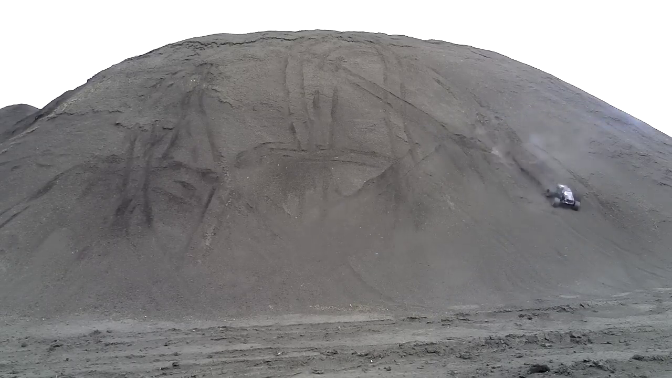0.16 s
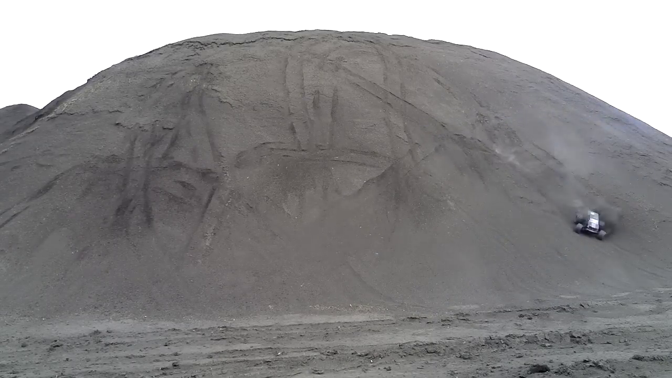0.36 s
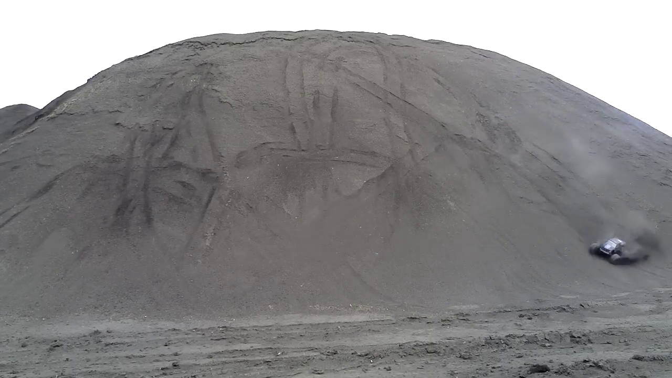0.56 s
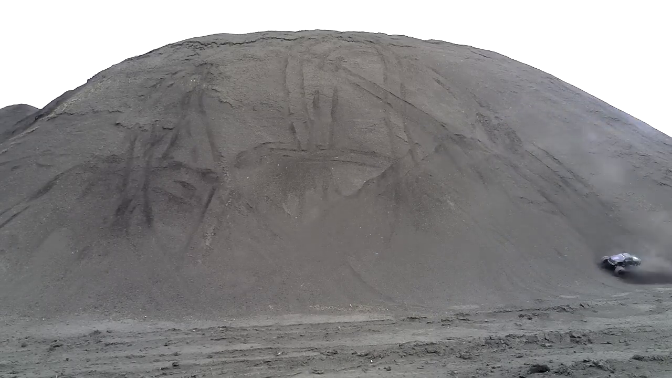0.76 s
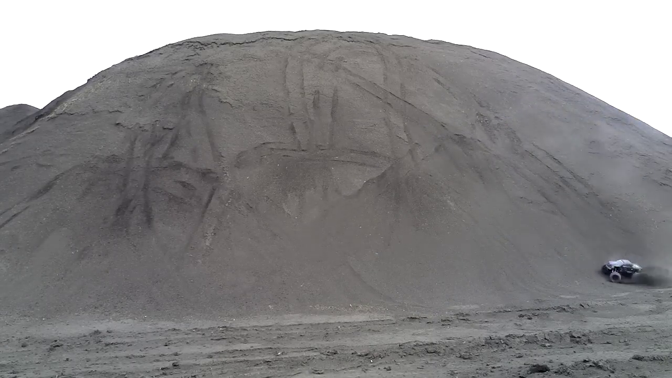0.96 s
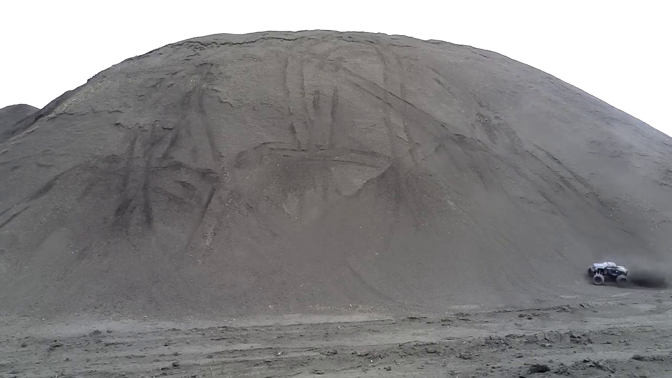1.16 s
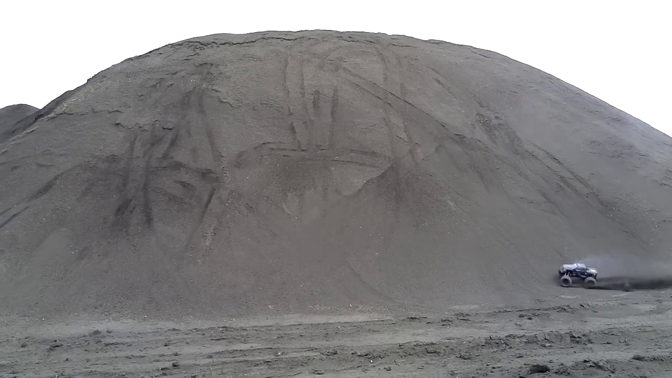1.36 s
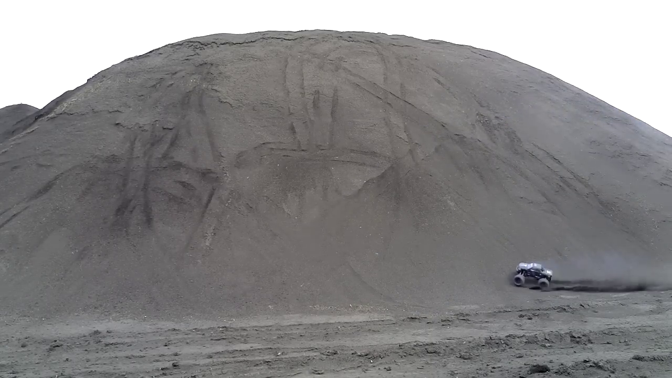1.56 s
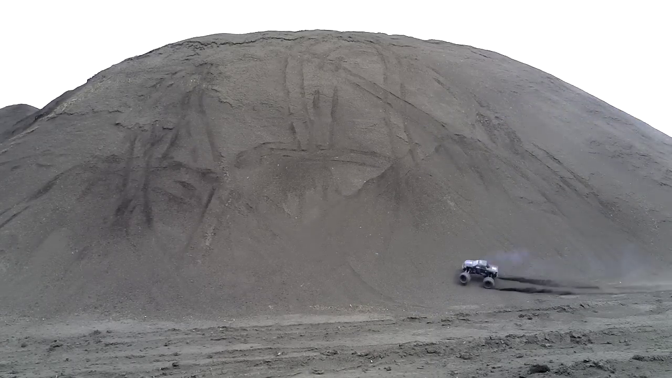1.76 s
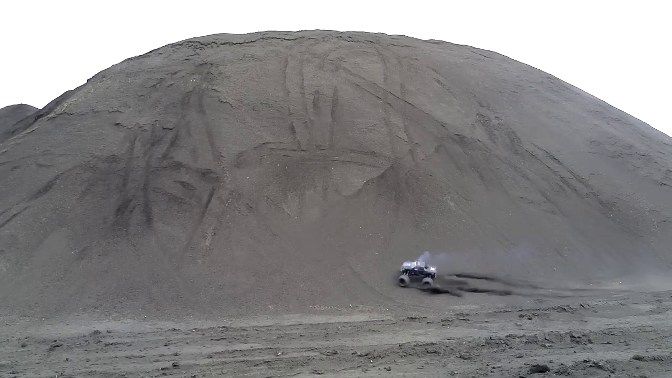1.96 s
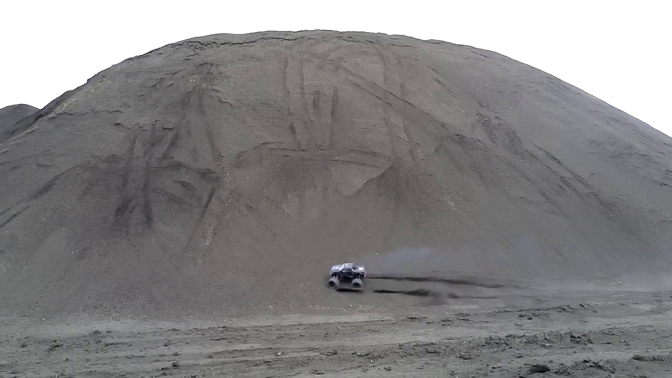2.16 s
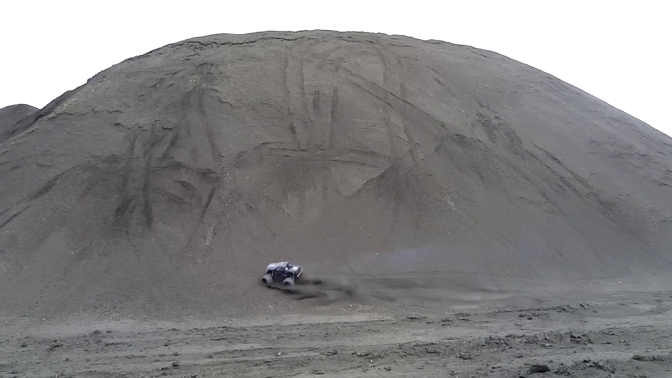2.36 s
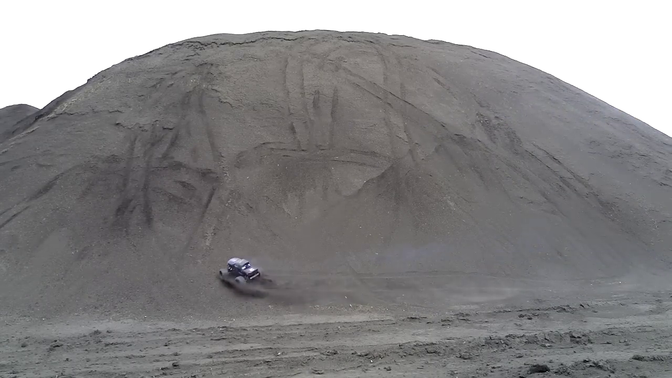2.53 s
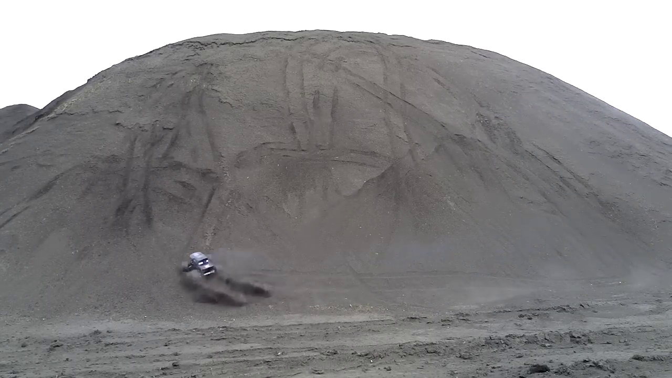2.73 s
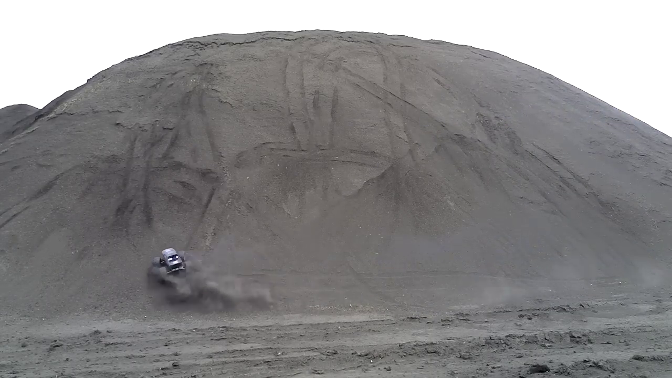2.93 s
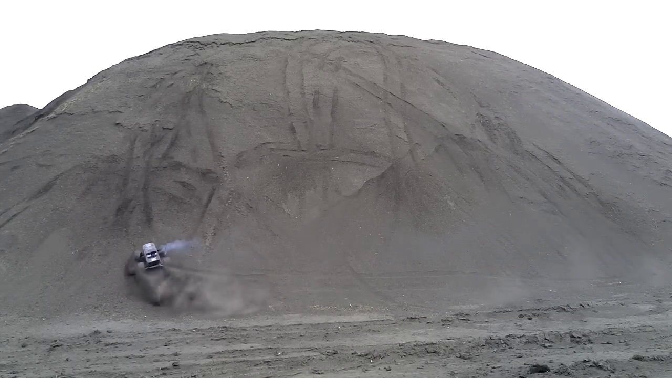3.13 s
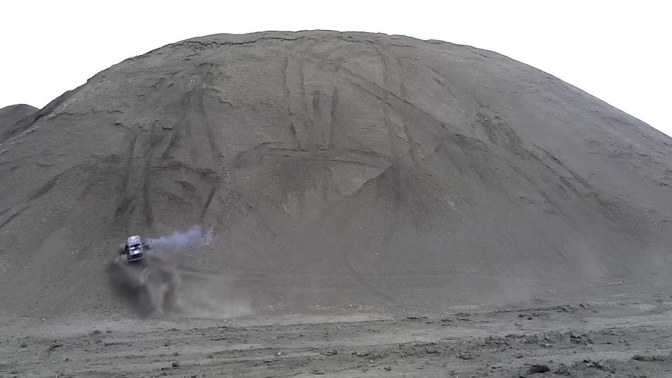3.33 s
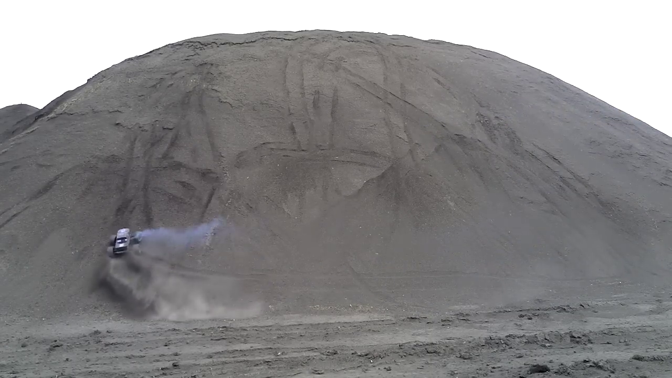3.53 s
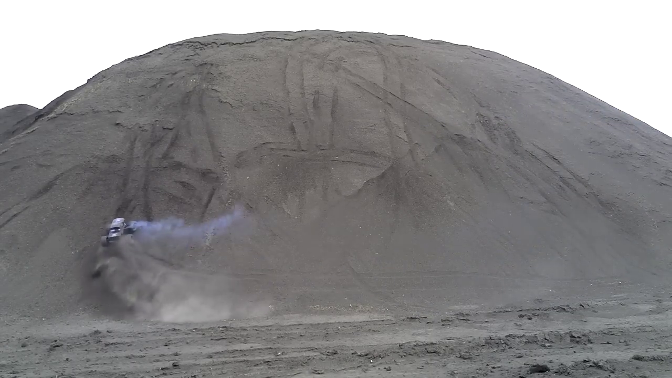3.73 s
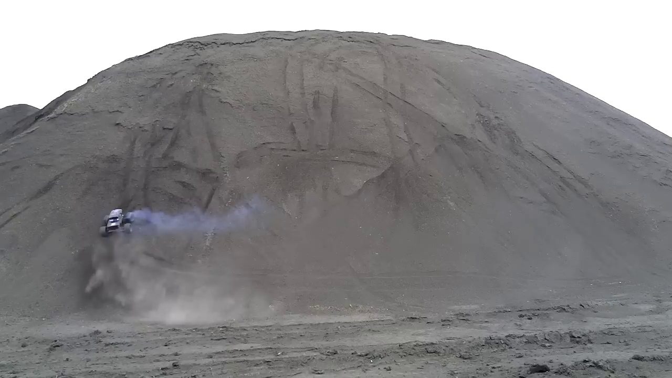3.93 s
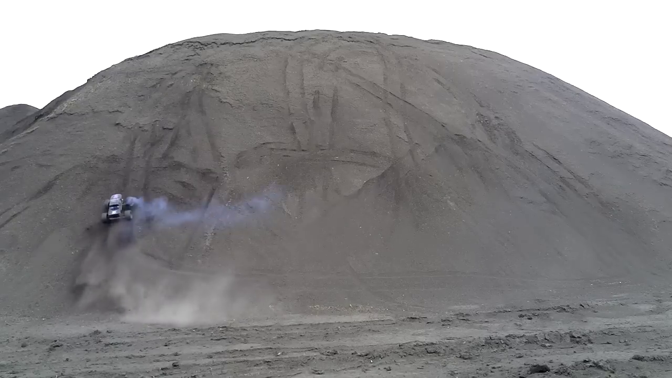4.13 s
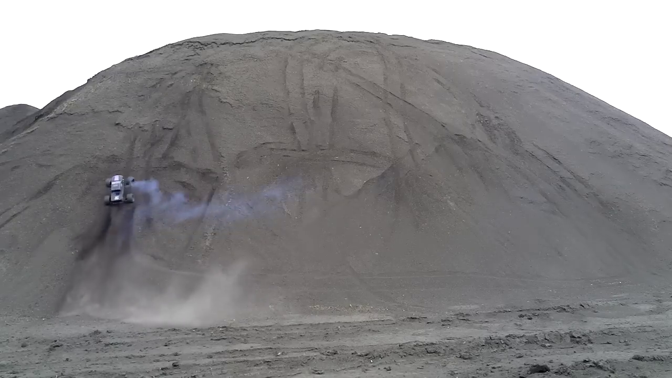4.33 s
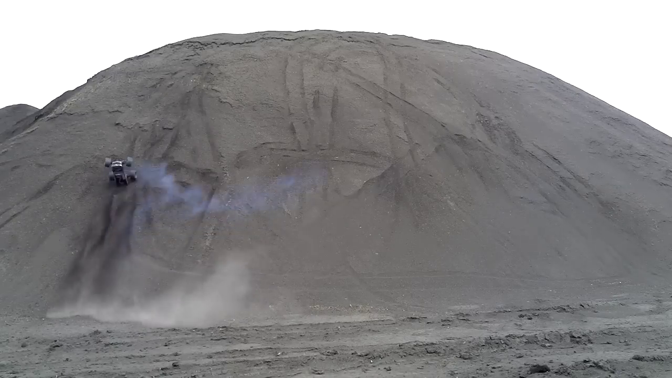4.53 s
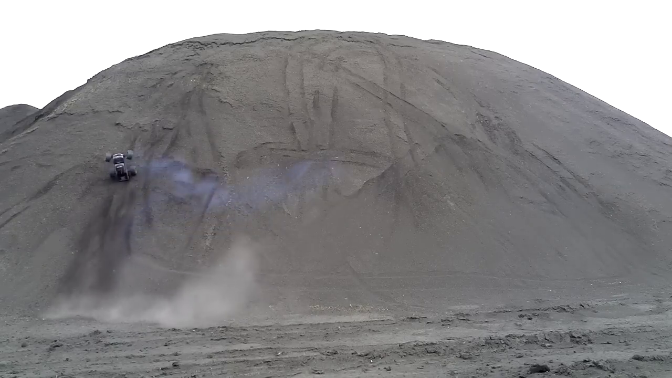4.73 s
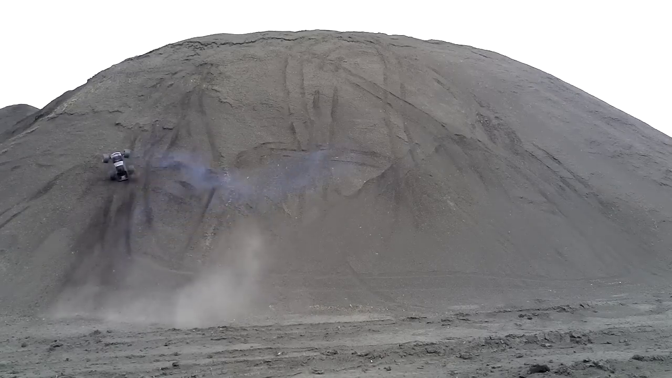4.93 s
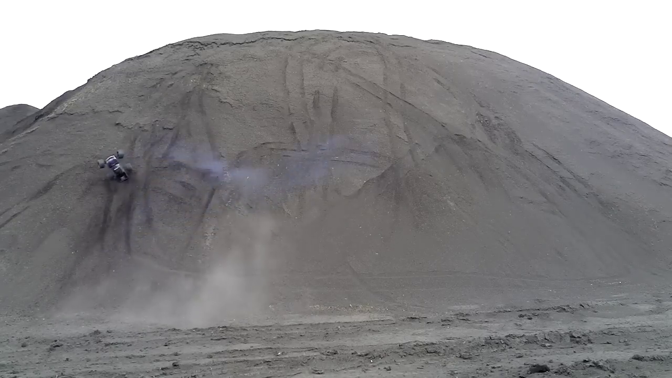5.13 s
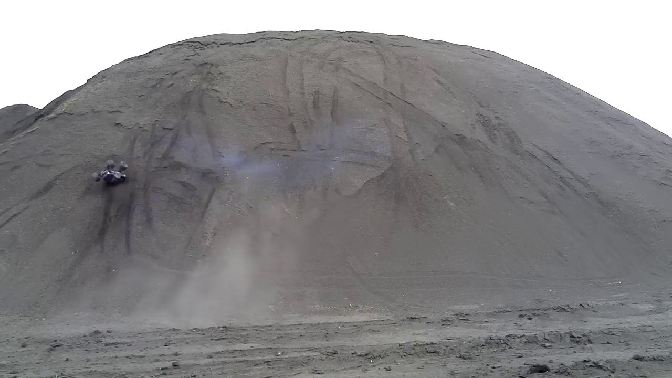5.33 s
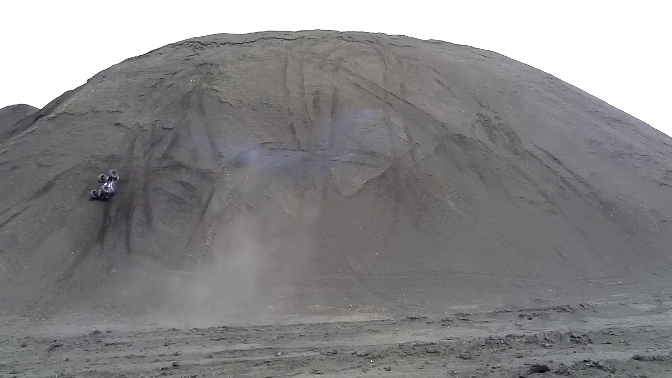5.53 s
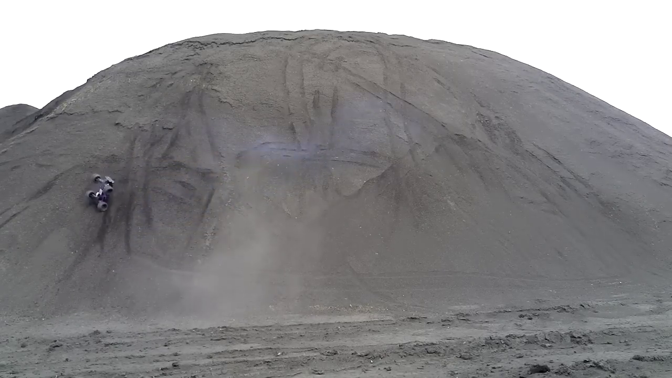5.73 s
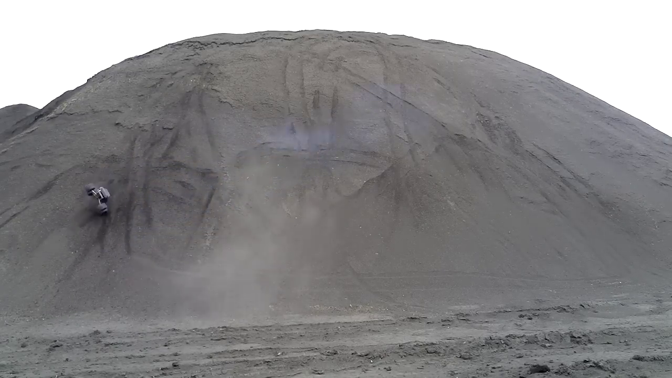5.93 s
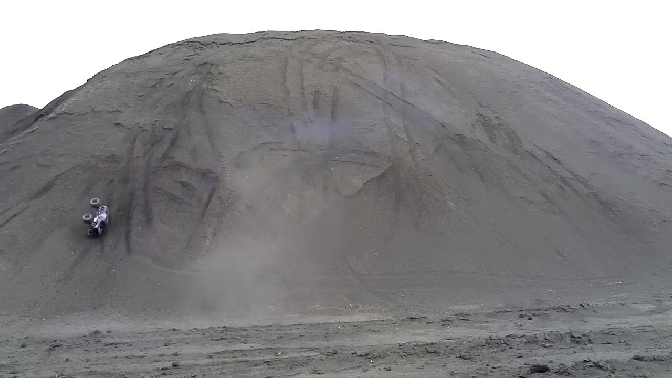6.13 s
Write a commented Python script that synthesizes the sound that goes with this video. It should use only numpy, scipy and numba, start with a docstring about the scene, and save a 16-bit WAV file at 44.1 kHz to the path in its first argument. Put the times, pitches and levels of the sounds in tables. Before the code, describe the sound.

Outdoors, a tiny high-revving engine blips and snarls, holds a strained rasping whine, then winds down to a steady popping idle as the chassis clatters.

```python
"""Two-stroke model truck on a sand hill

A small two-stroke model truck blips its throttle at the foot of a sand hill, climbs it and drops to idle.
Each firing is a pop of nearly in-step overtones, with rasp from shell resonances, eddies and gas noise.
The colour shifts as the pipe turns to or from a microphone with two unlike ports; knocks are decaying
rings, thin whistles are narrow noise, the slope returns a late copy and shaped noise is the open air."""
import sys
import numpy as np
from scipy import signal
from scipy.fft import rfft, irfft, next_fast_len
from scipy.io import wavfile
from scipy.ndimage import uniform_filter1d, map_coordinates
from numba import njit

SR = 44100
rng = np.random.default_rng(int(sys.argv[2]) if len(sys.argv) > 2 else 0)


def digitize_waveform(pressure):
    """Quantize a signal to 16-bit integers and store it at the path in sys.argv[1].

    Rows of a 2-D input are taken as channels; values are limited to [-1, 1].
    """
    field = np.atleast_2d(pressure).T
    bounded = np.clip(field, -1, 1)
    quanta = np.round(bounded * 32767).astype(np.int16)
    wavfile.write(sys.argv[1], SR, quanta)


N = 272979

# Engine speed. Each row: time in seconds, firing rate in Hz.
REVS = [(0, 299), (.08, 343.5), (.14, 289.4), (.26, 206.8), (.47, 198.2), (.79, 195.8), (.9, 281.3),
        (1., 269.3), (1.03, 284.5), (1.22, 307.6), (1.29, 338.6), (1.314, 327.2), (1.34, 357),
        (1.38, 332.7), (1.41, 366.8), (1.45, 347.4), (1.46, 394.3), (1.48, 391.7), (1.52, 321.3),
        (1.6, 312), (1.69, 324), (1.76, 366), (1.83, 340.5), (1.88, 281), (1.91, 332), (1.93, 334.4),
        (1.95, 301), (1.978, 357), (2.005, 325.7), (2.028, 361.9), (2.05, 346), (2.072, 376), (2.12, 374),
        (2.15, 401.4), (2.22, 341.2), (2.28, 258), (2.36, 211.2), (2.5, 190.2), (2.55, 200.4), (2.6, 274.6),
        (2.69, 295.1), (2.79, 247.2), (2.89, 269.7), (2.98, 264.3), (3.09, 310.5), (3.13, 303.5),
        (3.178, 339), (3.198, 322.3), (3.232, 351.5), (3.254, 344), (3.292, 377.4), (3.316, 378.7),
        (3.338, 361), (3.37, 392), (3.398, 372.3), (3.44, 405.2), (3.472, 392), (3.508, 427.9),
        (3.534, 413), (3.57, 431.8), (3.72, 379.2), (3.89, 443.4), (4.02, 417.8), (4.074, 426.5),
        (4.1, 398), (4.122, 399), (4.17, 368.3), (4.25, 443.6), (4.29, 386.5), (4.314, 413.4), (4.346, 394),
        (4.424, 420), (4.462, 399), (4.5, 409), (4.545, 351), (4.606, 351.8), (4.7, 282.5), (4.782, 257.3),
        (4.88, 236.6), (5.14, 218.4), (5.22, 200.9), (5.33, 193.1), (6.19, 192.2)]
# Waver of the revs. Each row: firing rate in Hz, share of that rate.
WAVER = [(200, .003), (240, .005), (290, .004), (345, .008), (430, .009)]
# Throttle blips. Each row: start of opening in seconds, start of shutting in seconds, rasp gained in dB.
BLIPS = [(0, 0.1, 3), (0.81, 0.945, 6), (0.969, 1.452, 3.5), (1.57, 1.774, 2), (1.892, 2.133, 4.5),
         (2.543, 2.705, 5), (2.797, 4.547, 4)]
THROTTLE_S = 0.051  # time to open or shut
# Pipe note against the rasp. Each row: pitch in Hz, then level in dB at the foot with throttle open,
# at the foot shut, on the hill open, on the hill shut.
PIPE_NOTE = [(203, -14, -5, -16, -2.5), (290, -7, 2, 4.5, -5.5), (380, -14, -6.5, -10, -18),
             (515, 4.5, 6.5, -5.5, -6.5), (615, 4, -11, -4.5, -3.5), (674, 4, -14, -13, 0),
             (797, -9, -26, -14, -1.5), (927, -12, -3, -6, 6.5), (1196, -10.5, -20.5, -9.5, -16.5),
             (1360, -15.5, -4, -6, -3), (1530, -16.5, -21.5, -12.5, -6), (1696, -25.5, -20, -5.5, -9.5),
             (2030, -17.5, -15, -7.5, -12), (2050, -25.5, -16.5, -12, -12), (2900, -26.5, -23, -14, -20.5),
             (3000, -22, -19, -14.5, -15), (3600, -22, -30, -21.5, -25), (5500, -20, -26, -29, -33)]
# Start and end in seconds of the turn uphill.
TURNS_UPHILL_S = (2.56, 2.926)
OVERTONES = 14  # tones in the pipe note, fundamental included
# With the throttle shut the overtones thin out until the revs are back at idle.
# Each row: firing rate in Hz, level change in dB.
COASTING = [(200, 0), (240, -3.5), (400, -6)]
WANDER_DB = 42  # slow swell of an overtone, per step above the fundamental (7 at most) and share of waver
# The two lowest tones change on their own as the truck moves over the ground.
# Each row: time in seconds, fundamental change in dB, octave change in dB.
LOWEST = [(0, -1, -6.5), (.2, 0.5, -9), (.85, 4, 5), (1.26, 1, 3.5), (1.31, -11, 0), (1.44, 0, 0.5),
          (1.49, -10.5, 10), (1.59, 0, -1), (1.68, -5, 3), (1.78, -5, -1), (1.86, -5.5, 8), (1.96, 4.5, 6),
          (2.01, -5, 2.5), (2.08, 3.5, -1), (2.15, 0, -5), (2.2, -5.5, 8), (2.25, -5.5, -11.5),
          (2.62, 7, 6), (3.1, 2.5, 8), (3.4, -0.5, 3.5), (3.9, -3.5, 0), (4.25, 1.5, 10),
          (4.52, -15.5, 10.5), (4.62, -14, -5), (4.69, 0.5, -0.5), (5.3, -6.5, -5.5), (5.65, -1, -3),
          (6.19, 5.5, 18)]
# Pipe resonances that lift or cut the overtones crossing them. Each row: centre in Hz, width as a
# share of the pitch.
PIPE_RINGS = [(1050, 0.22), (1370, 0.11), (1720, 0.13), (2550, 0.24)]
# How far each is aimed at the microphone. Each row: time in seconds, dB of each resonance, low to high.
PIPE_AIM = [(0, -4, -8, 7.5, 13.5), (.1, 10, -11, 13, 13), (.22, 5, 1, 7, 12), (.3, -3, 8, 11, 2),
            (.75, 1, 3.5, -7, 5), (.9, -0.5, -2, 1, 14), (1.05, 3.5, -2.5, 4, 9), (1.3, 4.5, -4, -1, -8),
            (1.47, -2, -2, 1, -21), (1.75, 1.5, -2, -1, 12), (2.13, -3, -7, 6, 16), (2.45, -19, 6, -4, 2),
            (2.55, -8, 5, 6, 9), (2.6, 2, -7, 3, 23.5), (2.7, -7, 0, 8, 17.5), (2.76, -7, 18, 16, 5),
            (2.95, -3, 4, -2, 6), (3.15, 5, 8, 1, 6.5), (3.55, -12, -1, 5.5, 0), (3.9, -4, -0.5, -1, -0.5),
            (4.15, -0.5, -5, 4.5, 5), (4.42, -10, 9, -3, 4.5), (4.55, 5, -11, -11, -7),
            (4.65, -7, -4, 7.5, 4), (4.75, 5, -7, 6.5, 8), (4.95, -1.5, 0, 7, 6), (5.25, 1, -1, 1, -13),
            (5.5, -6, -5, -6, -4), (5.75, 3, -1, -6, 4), (6.02, 8.5, 10, 4, 5), (6.19, 7, 2, -1, 7)]
# Exhaust rasp with the throttle shut, before the turning. Each row: firing rate in Hz, level in dB.
RASP = [(192, -38.5), (215, -37), (270, -30), (340, -23.5), (440, -22.5)]
# Change as the truck turns. Each row: time in seconds, facing resonance in Hz, level change in dB, note
# change in dB, roar change in dB, left minus right in dB before 4 dB is taken off.
TURN = [(0, 5050, 4.5, 5.5, -8, 4), (.08, 5200, -1.5, 0.5, 0, 4), (.14, 5030, -3, -2.5, 5, 4),
        (.26, 3280, 1, 3.5, 3.5, 3.5), (.7, 3040, -5.5, 4, 5, 4.5), (.95, 2582, -1, 2, -7, 4.5),
        (1.1, 5750, 5, -1.5, -3, 5), (1.3, 5500, 3, 2, 1, 5), (1.5, 5124, -2, 7.5, 7, 4.5),
        (1.65, 4364, 0.5, 6, 3, 4), (1.8, 3600, 1.5, 0.5, 5, 3.5), (1.89, 3300, 2, 1, 4, 4),
        (2., 3154, -2, 3, 4.5, 3.5), (2.2, 3000, 1, 3.5, 4, 3.5), (2.4, 3208, 4, -1.5, 3.5, 4),
        (2.6, 2593, 1, -1.5, 1, 4), (2.72, 2583, 2, -7.5, 1.5, 4), (2.79, 2594, 2.5, -0.5, 0, 4),
        (2.87, 2602, 2, -5.5, -2, 4), (3., 2580, 1.5, -5.5, 0.5, 3.5), (3.15, 5302, -0.5, -6, 3, 3.5),
        (3.45, 4350, 3, -0.5, 2, 3.5), (3.62, 6000, 1, 1.5, 2.5, 3.5), (3.85, 4610, 3, 2.5, 1, 3.5),
        (4.17, 6810, 1.5, -3, 2, 3), (4.3, 5510, -1.5, 0.5, 3.5, 3.5), (4.45, 4585, -1, -1.5, 3.5, 3.5),
        (4.55, 5060, -0.5, 1.5, 1, 3), (4.68, 5200, 1.5, -1.5, -3, 4), (4.9, 5102, 0, -4.5, -2, 3.5),
        (5.3, 6830, -2, -1.5, 1, 5), (5.5, 6910, -5.5, 5.5, 7, 5), (5.6, 3374, -3, 4.5, 7, 4),
        (5.88, 3400, -0.5, -2.5, 7.5, 4), (6.19, 3600, -2.5, -8.5, -8, 4.5)]
# Hiss and low roar follow the rasp. Each row: rasp in dB, hiss relative to it in dB before a lift of 4 dB,
# roar relative to it in dB before the turning.
MIX = [(-39, -9.5, -4.5), (-31, -8, -0.5), (-16, -7, -7)]
# At high revs the eddies slip against the crank and plain gas grows.
# Each row: firing rate in Hz, slip in turns, gas share.
SLIP = [(200, .004, 1.1), (300, .009, 1.1), (360, .013, 1.2), (430, .015, 1.2)]
# Body shell and pipe resonances. Each row: centre in Hz, width in Hz, level in dB before aim and flicker.
SHELL = [(2444, 91, -7), (4640, 85, 0.5), (5440, 590, 3), (5750, 130, -7), (6000, 92, 0.5),
         (6110, 110, 5.5), (6680, 120, 10.5)]
SHELL_DRIFT = .02  # share by which the resonances wander
# Bands of the rasp that open and close as the pipe swings. Each row: centre in Hz, width in Hz.
RASP_BANDS = [(2550, 520), (3550, 990), (6100, 1600), (9300, 3100)]
# Their swing. Each row: time in seconds, level of each band in dB, low to high.
RASP_BAND_DB = [(0, 0, -3, 1, 6.5), (.4, -2, 3, 2.5, -3), (.75, -2, 2.5, 2.5, -1), (.92, 0, 4, 2.5, 1),
                (1.2, 0, 0.5, 1, 6.5), (1.45, -2, 4, 3, 3), (1.75, 4, 3.5, -2, -7), (2.1, 4, 4.5, -5, 2.5),
                (2.3, 0, -6, 0, -2), (2.55, 5, -4, -3, -6), (2.65, -6, -14, 1.5, 1), (2.95, 3, -4, 3, -16),
                (3.15, -22, -4, 0.5, 0), (3.4, -11, 2.5, -0.5, 0.5), (3.75, 2, 1.5, 1.5, 3.5),
                (3.95, 4, -4, -3, 0.5), (4.2, -12, 4.5, 0.5, 2), (4.6, -2, -1.5, -2.5, 1),
                (5., -1, 0.5, -1, -3), (5.6, 0, -10, -2, -7), (6.19, 5, -3, 5, -11)]
# Echo off the slope. One row: mean delay in seconds, drift of the delay in seconds, level in dB.
SLOPE = (.03, .004, -14)
# Chassis knocks on the sand. Each row: start in seconds, level in dB before halving, ring in Hz.
KNOCKS = [(0.134, -21, 147), (0.172, -20.5, 216), (0.398, -29, 91.7), (1.637, -6, 4400), (1.9, -12, 4000),
          (2., -33, 89.8), (2.001, -3, 3940), (4.682, -20, 621), (5.155, -22, 648), (5.362, -21, 290),
          (5.585, -16.5, 941), (5.588, -24, 4420), (5.765, -22, 1098), (5.856, -24, 4013),
          (5.9112, -11.5, 3670), (5.955, -29, 4015)]
# Ring time of the knocks. Each row: ring in Hz, time in seconds to fall by 60 dB.
KNOCK_T60 = [(150, 0.075), (300, 0.04), (4000, 0.028)]
# Pitches in Hz of the thin whistles as the truck coasts.
WHISTLE_HZ = [5200, 5940, 6944]
# Their levels. Each row: time in seconds, dB of each whistle, low to high.
WHISTLE_DB = [(4.75, -61, -63, -70), (4.88, -43, -40, -70), (5.12, -48, -49, -65), (5.25, -46, -46, -44),
              (5.44, -49, -51, -36), (5.5, -65, -65, -50), (5.6, -70, -70, -54)]
# Colour of the two microphone ports. Each row: pitch in Hz, left in dB, right in dB, right lag in radians.
PORTS = [(60, -26, -8, -5.5), (216, -7.5, -17.5, 1.53), (410, 4.5, -3.5, 0.2), (565, -6, -11, 0),
         (2270, 1.5, -3, 0), (5500, 3.5, -2.5, 0.62), (6300, 1, -1, 1), (7300, -4, 4, 1),
         (9850, 7, -3.5, 2), (10140, 2, -13, 0.8), (11880, -11, -7.5, 1.5), (16000, 6, 1.5, 2.5)]
# Spectrum of the open air. Each row: pitch in Hz, relative level in dB per Hz.
FIELD = [(15, -14), (30, -7), (60, -23), (120, -16.5), (250, -5.5), (700, 3), (3000, -0.5), (8000, -25)]
FIELD_DB = -41.5  # rms level of the open air
NOTCH_HZ, NOTCH_WIDTH_HZ, TOP_HZ, OFFSET = 7875, 420, 15670, -0.0027  # offset in full-scale units


def engine():
    """Every firing drives the pipe note, rasp, hiss and roar, which reach both ports at unlike levels."""
    rate_hz = curves(REVS)[0]
    opening, open_db = throttle()
    facing_hz, turn_db, note_turn_db, roar_turn_db, pan_db = curves(TURN)
    rasp_db = law(rate_hz, RASP)[0] + open_db + turn_db
    waver = law(rate_hz, WAVER)[0]
    turns = crank(waver)
    note = pipe_note(turns, rate_hz, waver, opening, rasp_db + note_turn_db)
    body = exhaust(turns, rate_hz, facing_hz, rasp_db, roar_turn_db)
    sides_db = np.array([pan_db - 4, 4 - pan_db]) / 2
    return (note + undb(rasp_db) * body) * undb(sides_db)


def throttle():
    """Opening 0-1 of the throttle, ramped at each blip, and the dB it adds to the rasp."""
    t = np.arange(N) / SR
    opening, gained_db = np.zeros(N), np.zeros(N)
    for on, off, db in BLIPS:
        already_open = THROTTLE_S * (on == 0)
        rise = np.clip((t - on + already_open) / THROTTLE_S, 0, 1)
        fall = np.clip(1 - (t - off) / THROTTLE_S, 0, 1)
        opening += rise * fall
        gained_db += db * rise * fall
    return np.clip(opening, 0, 1), gained_db


def crank(waver):
    """Crank turns so far: the sum of a firing rate that wavers."""
    return np.cumsum(curves(REVS)[0] * (1 + waver * (walk(45) + walk(150)))) / SR


def pipe_note(turns, rate_hz, waver, opening, base_db):
    """Overtones of the firing rate, kept nearly in step so that each firing is one sharp pop."""
    thinning_db = (1 - opening) * law(rate_hz, COASTING)[0]
    levels_db = []
    for k in range(OVERTONES):
        wander_db = WANDER_DB * waver * min(k, 7) * walk(8)
        db = base_db + wander_db + overtone_db((k + 1) * rate_hz, opening)
        levels_db.append(db + (k > 0) * thinning_db)
    levels_db[:2] = np.add(levels_db[:2], curves(LOWEST))
    # every overtone flutters on its own as firings come uneven, most when the revs waver
    flutter_db = 1.3 + 110 * waver
    spread = .1  # radians per order squared
    note = np.zeros(N)
    for k, db in enumerate(levels_db):
        gain = np.sqrt(2) * undb(db + flutter_db * walk(45))
        jitter = (.35 + .04 * k) * walk(60)
        note -= gain * np.cos(2 * np.pi * (k + 1) * turns + spread * k * k + jitter)
    return note


def overtone_db(hz, opening):
    """Level of an overtone against the rasp, by throttle and by the side of the pipe that shows."""
    foot_open, foot_shut, hill_open, hill_shut = law(hz, PIPE_NOTE)
    uphill = np.interp(np.arange(N) / SR, TURNS_UPHILL_S, [0, 1])
    foot = foot_shut + opening * (foot_open - foot_shut)
    hill = hill_shut + opening * (hill_open - hill_shut)
    rings_db = 0
    for db, (centre, width) in zip(curves(PIPE_AIM), PIPE_RINGS):
        rings_db = rings_db + db * np.exp(-(np.log(hz / centre) / width) ** 2)
    return foot + uphill * (hill - foot) + rings_db


def exhaust(turns, rate_hz, facing_hz, rasp_db, roar_turn_db):
    """Eddies and gas noise make rasp through the shell, high hiss and low roar, relative to the rasp level."""
    slip, gas_share = law(rate_hz, SLIP)
    hiss_db, roar_db = law(rasp_db, MIX)
    eddies = steady(pattern(turns + slip * walk(90), first=8, last=42, puff_len=.55), .025)
    gas = gas_puffs(turns)
    # gas[0] reaches both ports, gas[1:] one port each
    drive = eddies + gas_share * (gas[0] + .68 * gas[1:])
    rasp = band(band(drive, 1640, 10400), 1460, 14900) + 0.93 * shell(drive, facing_hz)
    spray = .7 * eddies + gas[0] + .8 * gas[1:]
    hiss = band(spray, 10430, 12320) * undb(1.0 * walk(25.07))
    roar = band(band(gas[0] + 0.27 * gas[1:], 270, 5300), 124, 15700) * undb(2.0 * walk(25.04))
    low = undb(roar_db + roar_turn_db) * steady(roar, 0.18)
    high = undb(hiss_db + 4) * steady(hiss, 0.15)
    return aimed(steady(rasp)) + low + high


def pattern(turns, first, last, puff_len, knee=18, renew=52, size=512):
    """Eddies that repeat turn after turn and are replaced renew times a second: broken overtones."""
    fade = np.exp(-np.arange(size) / size / puff_len)
    shapes = rng.standard_normal((N * renew // SR + 2, size)) * fade
    orders = rfft(shapes)
    orders[:, :first] = orders[:, last:] = 0
    orders /= 1 + (np.arange(size // 2 + 1) / knee) ** 2  # high orders are weaker
    cycles = irfft(orders)
    cycles = np.hstack([cycles, cycles[:, :1]])  # wraps round to the next turn
    row = np.clip(np.arange(N) / SR * renew + walk(9) / 2, 0, len(cycles) - 1)
    return map_coordinates(cycles, [row, turns % 1 * size], order=1)


def gas_puffs(turns):
    """Fresh gas leaves in a fading puff each turn: one noise shared by the ports and one for each."""
    gas = rng.standard_normal((3, N)) * undb(0.49 * walk(36))
    gas = gas * (1 + undb(2 * walk(200)) * np.exp(-(turns % 1) / .4))
    return gas / gas.std()


def shell(drive, facing_hz, reach=0.43):
    """Wandering resonances; those near the facing pitch are aimed at the microphone, and each one flickers."""
    out = np.array([undb(-2.5) * ring(port, facing_hz, 420.0) for port in drive])
    for hz, width_hz, db in SHELL:
        facing = 0.36 + np.exp(-(np.log(facing_hz / hz) / reach) ** 2)
        gain = undb(db + 4.7 * walk(9)) * facing
        centre_hz = hz * (1 + SHELL_DRIFT * walk(5))
        out = out + gain * np.array([ring(port, centre_hz, 1. * width_hz) for port in drive])
    return out


def aimed(x):
    """Each band of the rasp lifted or cut along its curve as the pipe swings."""
    for db, (hz, width_hz) in zip(curves(RASP_BAND_DB), RASP_BANDS):
        centre_hz = np.full(N, 1. * hz)
        x = x + (undb(db) - 1) * np.array([ring(port, centre_hz, 1. * width_hz) for port in x])
    return x


def slope(x):
    """A late copy off the hillside, some 10 m longer in path, whose drifting delay blurs the overtones."""
    delay_s, drift_s, db = SLOPE
    read = np.arange(N) - SR * (delay_s + drift_s * walk(2))
    # each port's path also drifts by a few samples of its own
    return x + undb(db) * np.array([map_coordinates(port, [read - 8 * walk(4)], order=1) for port in x])


def knocks():
    """Short decaying rings with a gritty tail as the chassis meets the ground, alike at both ports."""
    out = np.zeros(N)
    t = np.arange(4000) / SR
    for start_s, db, hz in KNOCKS:
        t60 = law(hz, KNOCK_T60)[0]
        grit = band(rng.standard_normal(len(t)), hz / 2, hz * 2)
        tone = np.sin(2 * np.pi * hz * t) * min(300 / hz, 1)
        hit = (tone + grit / grit.std()) * np.exp(-np.log(1000) * t / t60)
        start = int(start_s * SR)
        out[start:start + len(t)] += undb(db) * hit / 2
    return out


def whistle():
    """Narrow bands of noise, which flutter by themselves, as the truck coasts."""
    tones = [band(rng.standard_normal(N), hz * .993, hz * 1.007) for hz in WHISTLE_HZ]
    return sum(undb(db) * tone / tone.std() for db, tone in zip(curves(WHISTLE_DB), tones))


def field():
    """Faint open-air rumble: shaped noise, partly shared by the ports, swelling gently."""
    noise = rng.standard_normal((3, N))
    hz, db = np.transpose(FIELD)
    air = np.array([colour(noise[0] + 0.3 * own, hz, db) for own in noise[1:]])
    air = air * undb(2. * walk(5.78))
    return air * undb(FIELD_DB) / air.std()


def undb(db):
    """Gain of a level in dB."""
    return 10 ** (np.asarray(db) / 20)


def law(x, table):
    """Columns of a table read at x."""
    key, *columns = np.transpose(table)
    return [np.interp(x, key, c) for c in columns]


def curves(table):
    """Columns of a table by time, one value a sample."""
    return law(np.arange(N) / SR, table)


def walk(rate):
    """Random levels held 1 / rate s and slewed twice; spread near 1."""
    k = int(SR / rate)
    held = np.repeat(rng.standard_normal(N // k + 1), k)
    return 1.3 * uniform_filter1d(uniform_filter1d(held, k), k)[:N]


def steady(x, span_s=0.11):
    """Short-term rms level held at 1."""
    return x / np.sqrt(uniform_filter1d(x ** 2, int(span_s * SR)) + 1e-12)


def band(x, lo_hz, hi_hz):
    """Fixed band-pass."""
    return signal.sosfilt(signal.butter(2, [lo_hz, hi_hz], "band", fs=SR, output="sos"), x)


@njit
def ring(x, hz, width_hz):
    """Resonant band-pass whose centre may move, gain 1 at the centre."""
    y, b, l = np.empty(len(x)), 0., 0.  # b and l: band and low states
    for i in range(len(x)):
        g, k = np.tan(np.pi * hz[i] / SR), width_hz / hz[i]
        v = (b + g * (x[i] - l)) / (1 + g * (g + k))
        b, l, y[i] = 2 * v - b, l + 2 * g * v, k * v
    return y


def colour(x, hz, db, lag=0):
    """Spectrum shaped by points of level in dB and lag in radians, joined along log frequency."""
    size = next_fast_len(N)
    f = np.log(np.arange(size // 2 + 1) * SR / size + 1)
    turn = np.exp(-1j * np.interp(f, np.log(hz), lag + np.zeros(len(hz))))
    gain = undb(np.interp(f, np.log(hz), db))
    return irfft(rfft(x, size) * gain * turn, size)[:N]


def scene():
    """The truck, its echo, knocks and whistles through each port's own colour, over the open air."""
    left, right = slope(engine()) + knocks() + whistle()
    hz, left_db, right_db, lag = np.transpose(PORTS)
    return np.array([colour(left, hz, left_db), colour(right, hz, right_db, lag)]) + field()


def record(dry):
    """A narrow notch near 8 kHz applied twice, clipped peaks, a steep top cut and a small offset."""
    b, a = signal.iirnotch(NOTCH_HZ, NOTCH_HZ / NOTCH_WIDTH_HZ, SR)
    notched = signal.lfilter(b, a, signal.lfilter(b, a, dry))
    clipped = np.clip(notched, -1.1, 1.1)
    top_cut = signal.ellip(14, .3, 80, TOP_HZ, fs=SR, output="sos")
    return signal.sosfilt(top_cut, clipped) + OFFSET


dry = scene()
out = record(dry)
digitize_waveform(out)
```